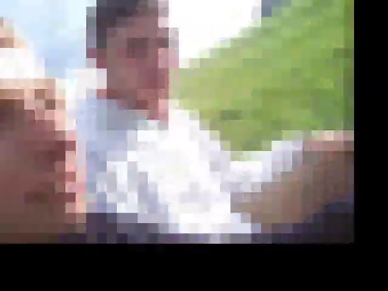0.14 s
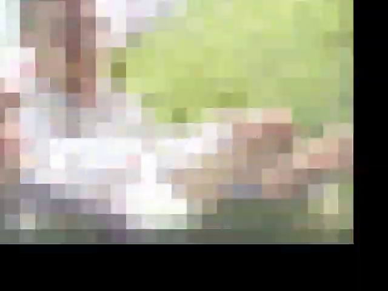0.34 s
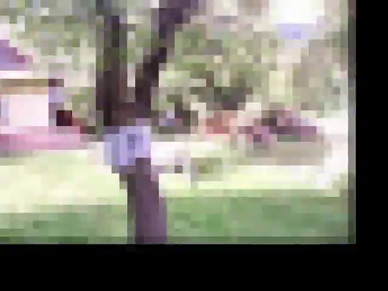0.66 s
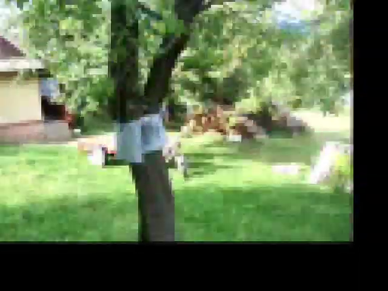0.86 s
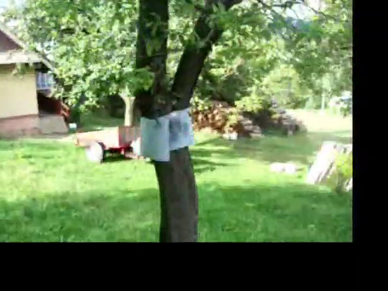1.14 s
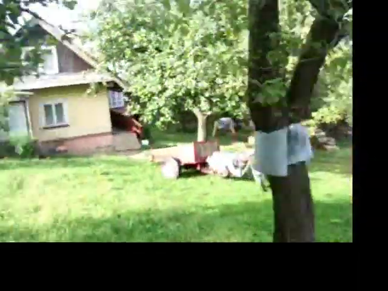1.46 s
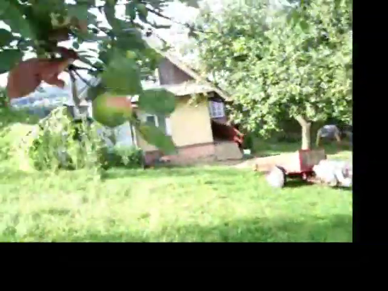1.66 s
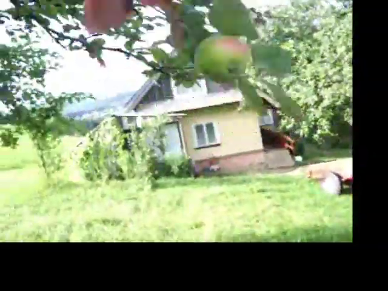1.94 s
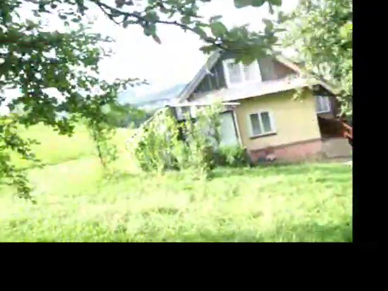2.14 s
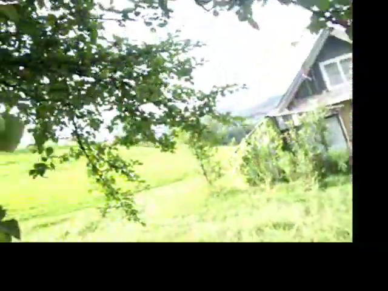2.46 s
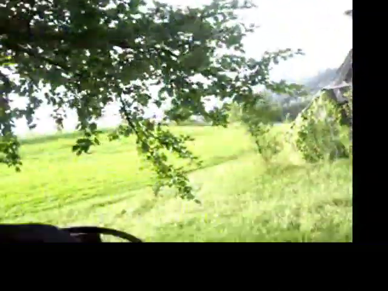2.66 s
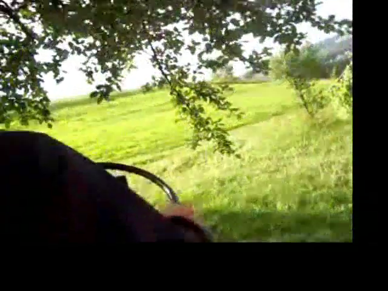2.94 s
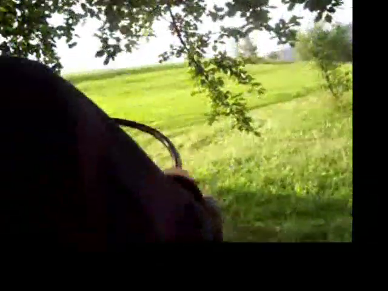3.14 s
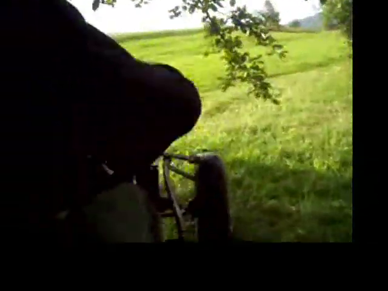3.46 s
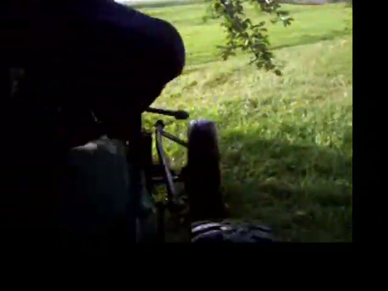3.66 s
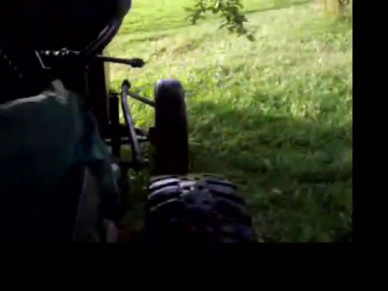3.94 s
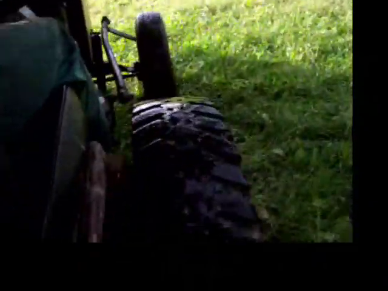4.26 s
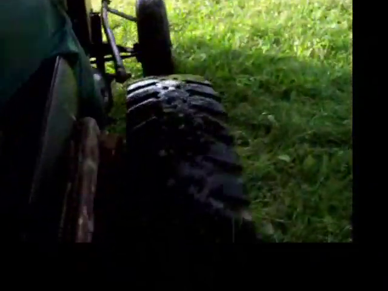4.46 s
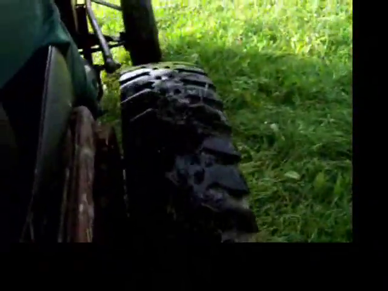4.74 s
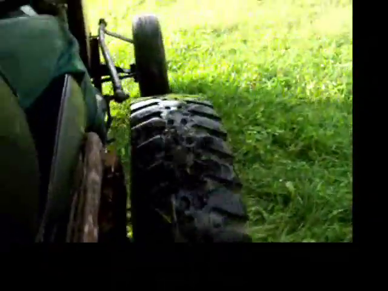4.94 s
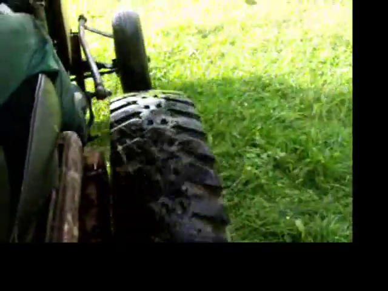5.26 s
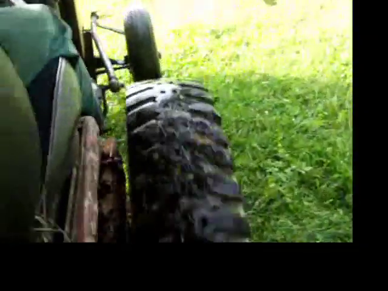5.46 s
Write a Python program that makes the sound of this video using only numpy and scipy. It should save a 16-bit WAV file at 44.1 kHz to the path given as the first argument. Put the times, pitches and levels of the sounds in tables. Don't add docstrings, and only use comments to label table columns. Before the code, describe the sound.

On board a small homemade tractor in open grass, a single-cylinder engine starts busy and uneven over strong cutter and gear roar. Within about a second the roar dies back and the exhaust falls into an even, hollow beat, six a second, with panel slams, knocks and tinny rattles between. After two seconds the microphone turns toward the wheel and the booms grow stronger. Cheap close microphone, overloaded peaks, dry open air.

```python
import sys
import numpy as np
from scipy import signal
from scipy.fft import rfft, irfft, next_fast_len
from scipy.io import wavfile
from scipy.ndimage import map_coordinates

SR = 44100
rng = np.random.default_rng(int(sys.argv[2]) if len(sys.argv) > 2 else 0)


def ratio_of_db(decibels):
    return 10 ** (np.asarray(decibels, float) / 20)


def transcribe(signal):
    frames = np.atleast_2d(signal).T
    limited = np.clip(frames, -1, 1)
    pcm = np.round(limited * 32767).astype(np.int16)
    wavfile.write(sys.argv[1], SR, pcm)


N = 246959


def unit(x):
    return x / np.sqrt(np.mean(x ** 2) + 1e-20)


def filtered(x, response):
    m = next_fast_len(N + SR // 2)
    spectrum = rfft(x, m) * response(np.fft.rfftfreq(m, 1 / SR))
    return irfft(spectrum, m)[..., :N]


def shape(points):
    f, db = np.transpose(points)
    return lambda hz: ratio_of_db(np.interp(np.log(hz + 1), np.log(f + 1), db, -120, -120))


def peak(f, hz, width):
    return 1j * f * width / (hz * hz - f * f + 1j * f * width + 1e-9)


def wobble(rate):
    knots = rng.standard_normal(int(N * rate / SR) + 4)
    return map_coordinates(knots, [np.arange(N) * rate / SR])


def noise(response, rough_db, rate):
    return unit(filtered(ratio_of_db(rough_db * wobble(rate)) * rng.standard_normal(N), response))


def add(track, s, piece):
    part = track[max(round(s * SR), 0):][:len(piece)]
    part += piece[:len(part)]


def bursts(times, dbs, t60s, rise, bend=1):
    env, t = np.zeros(N), np.arange(SR // 5) / SR
    for s, db, t60 in zip(times, dbs, t60s):
        fall = (np.maximum(t - rise, 0) / max(t60, 0.01)) ** bend
        swell = np.minimum(t / rise, 1) ** 0.5
        add(env, s - rise, ratio_of_db(db - 60 * fall) * swell)
    return env


def turned(s, pair):
    return np.interp(s, (2.24, 2.34), pair)


def damped(s, pair):
    return turned(s, pair) * np.where(s < 0.8, 0.65, 1)


def scatter(s):
    return rng.standard_normal((len(s), 2)).T


SCATTER_DB = 3

# (time [s], rolling level [dB], cutter level [dB])
LOAD = [(0.0, -18.5, -14), (0.25, -20.5, -17), (0.47, -23, -20), (0.809, -26, -24), (1.181, -29.5, -34.5),
        (1.448, -31.5, -35.5), (1.569, -27, -34), (1.758, -27.5, -34.5), (2.08, -23.5, -32.5),
        (2.34, -31, -36), (2.6, -29, -38.5), (2.81, -27, -38.5), (3.1, -26, -31.5), (3.452, -29, -36),
        (4.022, -24, -27.5), (4.57, -26.5, -30.5), (4.939, -24.5, -27.5), (5.6, -24, -29.5)]
# (frequency [Hz], level [dB per Hz])
SHAKE_COLOUR = [(12, -32.5), (20, -3), (86, -7.5), (140, -14.5), (180, -31), (310, -120)]
DRONE_COLOUR = [(59, -42), (100, -5.5), (275, -2.5), (314, -3), (366, -10), (450, -15.5), (580, -58.5),
                (990, -120)]
ROAR_COLOUR = [(220, -17.5), (380, -4), (472, 2), (562, 2.5), (611, -4), (693, 2), (773, 1), (995, -3),
               (1420, -22.5), (1600, -16.5), (2080, -40), (3520, -120)]
WHIRR_COLOUR = [(760, -38.5), (1300, 2.5), (1420, -37.5), (1590, -5.5), (2170, -0.5), (2480, -1.5),
                (2990, -8), (3430, -7.5), (3920, -13), (4740, -25.5), (6160, -74.5), (10400, -120)]


def running():
    s, *cols = np.transpose(LOAD)
    shaft_db = 0.7 * wobble(25)
    drone_db, roar_db = (np.interp(np.arange(N) / SR, s, c) + shaft_db for c in cols)
    shake_db = 5 + 1.746 * drone_db
    whirr_db = -18 + 0.83 * roar_db
    shake = ratio_of_db(shake_db) * noise(shape(SHAKE_COLOUR), rough_db=-3.0, rate=34)
    drone = ratio_of_db(drone_db) * noise(shape(DRONE_COLOUR), rough_db=3.0, rate=51)
    roar = ratio_of_db(roar_db) * noise(shape(ROAR_COLOUR), rough_db=0.5, rate=160)
    whirr = ratio_of_db(whirr_db) * noise(shape(WHIRR_COLOUR), rough_db=2.0, rate=67)
    return shake + drone + roar + whirr


def rattles():
    slam_s, _, _, cowl_db = np.transpose(PANEL_SLAMS)
    fire_s = np.transpose(EVEN_FIRINGS)[0]
    stray_s, stray_db, _ = np.transpose(VALVE_CLOSINGS + STRAY_BLOWS)
    t60 = 0.077

    def small(s, db):
        return [s, db + SCATTER_DB * scatter(s)[0], np.full(len(s), t60)]

    late = turned(slam_s, (0.0045, 0.0105))
    return np.hstack([[slam_s + late, cowl_db, damped(slam_s, (0.072, 0.088))],
                      small(fire_s - 0.012, turned(fire_s, (-18, -25))),
                      small(fire_s + 0.029, turned(fire_s, (-25, -28))),
                      [stray_s, stray_db, np.full(len(stray_s), t60)]])


# (frequency [Hz], width [Hz], level [dB])
COWLING_MODES = [(1990, 430, -3), (2323, 302, 2.5), (2655, 280, 0), (3480, 570, -12.5)]


def clatter():
    s, db, t60 = rattles()

    def cowling(f):
        modes = sum((-1) ** k * ratio_of_db(g) * peak(f, c, w) for k, (c, w, g) in enumerate(COWLING_MODES))
        return modes * peak(f, 2300, 1200)

    ringing = noise(cowling, rough_db=1.5, rate=300)
    wash = noise(shape(WHIRR_COLOUR), rough_db=1.5, rate=300)
    hum = ratio_of_db(turned(np.arange(N) / SR, (-47, -48)))
    near = (hum + bursts(s, db - 7.0, t60, rise=0.0017, bend=1.206)) * ringing
    return near + bursts(s, db - 18.5, 2.5 * t60, rise=0.00067) * wash


# (time [s], rattle level [dB], knock level [dB])
VALVE_CLOSINGS = [(.2843, -18, -14), (.6135, -41, -30), (.78, -20, -33), (1.455, -24.5, -11),
                  (1.623, -34, -10.5), (1.79, -25, -15.5), (1.952, -26, -12), (2.118, -18.5, -11),
                  (2.618, -31, -12.5), (2.783, -29.5, -13), (2.947, -30.5, -9.5), (3.109, -33.5, -11),
                  (3.436, -27.5, -11), (3.597, -33, -9), (3.758, -38.5, -10), (3.917, -26.5, -7),
                  (4.083, -32.5, -10.5), (4.233, -30, -14), (4.389, -26.5, -12.5), (4.548, -28.5, -12.5),
                  (4.704, -35, -10), (4.861, -27.5, -11.5), (5.321, -31.5, -9), (5.474, -37, -30)]
# (time [s], rattle level [dB], knock level [dB])
STRAY_BLOWS = [(0.103, -14.5, -25), (.147, -23.5, -16), (0.2123, -13, -19.5), (.273, -40.5, -5),
               (.347, -15, -6), (0.379, -20.5, -30), (.397, -34, -5.5), (.553, -42.5, -14),
               (.857, -14, -9.5), (1.009, -22, -21), (1.347, -29.5, -24)]


def blows():
    slam_s, slam_db, _, _ = np.transpose(PANEL_SLAMS)
    fire_s = np.transpose(EVEN_FIRINGS)[0]
    stray_s, _, stray_db = np.transpose(VALVE_CLOSINGS + STRAY_BLOWS)
    s, db, hz = np.hstack([
        [slam_s, slam_db + turned(slam_s, (4.5, 1)), turned(slam_s, (810, 654))],
        [fire_s - 0.006, turned(fire_s, (-10, -13.5)), np.full(len(fire_s), 780)],
        [stray_s, stray_db, turned(stray_s, (758, 640))]])
    size, pitch = scatter(s)
    return np.transpose([np.maximum(s, 0.003), db + 0.2 * SCATTER_DB * size, hz * np.exp(0.1 * pitch)])


def knocks():
    out, t = np.zeros(N), np.arange(SR // 8) / SR
    f = np.fft.rfftfreq(len(t), 1 / SR)
    env = ratio_of_db(-60 * (t / 0.067) ** 2) * (1 - np.exp(-t / 0.0013))
    for s, db, hz in blows():
        grit = rng.standard_normal(len(t))
        buzz = env * irfft(rfft(grit) * peak(f, hz, 370) ** 2, len(t))
        even = np.linalg.norm(env) / np.linalg.norm(buzz)
        add(out, s - 0.003, ratio_of_db(db - 10.5) * buzz * even)
    return out


# (time [s], spray level [dB], thump level [dB], cowling level [dB])
PANEL_SLAMS = [(0.0438, -10, -11, -15.5), (0.3153, -17, -14, -11), (0.4542, -14.5, -13.5, -18.5),
               (0.4854, -29, -19.5, -6), (.5875, -20, -35, -19.5), (0.6511, -13.5, -16.5, -4),
               (0.7213, -17.5, -31.5, -26.5), (.819, -12.5, -5.5, -4), (1.4902, -19.5, -13, -11),
               (1.6584, -14, -11.5, -2.4), (1.8228, -12, -11, -5), (1.9906, -16.5, -10, -11),
               (2.1523, -24.5, -14, -24), (2.6526, -19, -8.5, -13.5), (2.8198, -14.5, -8.5, -12),
               (2.9844, -12, -8, -12.5), (3.1443, -14.5, -7.5, -13), (3.47, -23.5, -7, -17.5),
               (3.6314, -21, -6, -12.5), (3.7958, -15.5, -7.5, -13), (3.9525, -14, -8, -13),
               (4.112, -14, -5.5, -20), (4.5824, -15.5, -7.5, -12.5), (4.7408, -16, -7, -16),
               (4.8978, -15, -4.5, -14), (5.0508, -17, -9.5, -13.5), (5.2071, -35, -16, -27.5),
               (5.359, -32, -20, -34.5)]
# (frequency [Hz], level [dB per Hz])
SPRAY_COLOUR = [(820, -49), (1400, -11.5), (1530, -11), (1790, -4), (1940, -19), (2700, -6.5), (2930, -6),
                (3860, -6), (4740, -23.5), (6160, -61), (10400, -120)]


def slams():
    s, db, thump_db, cowl_db = np.transpose(PANEL_SLAMS)
    t60 = damped(s, (0.12, 0.18))
    jolt_db = cowl_db + turned(s, (-15, -4))
    spray = bursts(s, db - 11, t60, rise=0.001, bend=0.76)
    spray += bursts(s + 0.0049, db - 11.0, 1.01 * t60, rise=0.0013, bend=0.96)
    out = spray * noise(shape(SPRAY_COLOUR), rough_db=1.5, rate=300)
    t = np.arange(SR // 10) / SR
    thump = np.sin(2 * np.pi * 235 * t) * np.exp(-(t / 0.007) ** 2) * (1 - np.exp(-t / 0.0016)) * 1.32
    jolt = np.sin(2 * np.pi * 62 * t) * np.exp(-t / 0.016)
    for at, thump_gain, jolt_gain in zip(s, ratio_of_db(thump_db - 2.5), ratio_of_db(jolt_db + 0.5)):
        add(out, at - 0.002, thump_gain * thump + jolt_gain * jolt)
    return out


# (time [s], blast level [dB], pipe pitch [Hz])
UNEVEN_FIRINGS = [
    (0.081, -2.5, 310),
    (.212, -4.5, 250.3),
    (0.352, -3, 241),
    (.485, -8, 290),
    (.527, -9.5, 270),
    (.619, -9.5, 265),
    (.696, -5.5, 283),
    (.751, -14, 299),
    (.863, -6, 292.3),
]
# (time [s], blast level [dB], pipe pitch [Hz])
EVEN_FIRINGS = [(1.028, -0.5, 261.3), (1.195, -2.5, 268), (1.366, -1.5, 244.5), (1.537, -4.5, 278),
                (1.704, -3, 283), (1.87, -3, 269.4), (2.031, -4.5, 286), (2.196, -3.5, 248),
                (2.363, -2.5, 228), (2.531, -0.5, 244.8), (2.697, -1.5, 263), (2.867, -2.5, 272),
                (3.027, -2.5, 248.5), (3.19, 1, 275), (3.353, 3.5, 249.4), (3.514, 1.5, 256.3),
                (3.677, 1.5, 260.4), (3.835, 0, 281), (3.995, 1.5, 268), (4.154, -1, 279.4), (4.31, 3, 270),
                (4.467, 4, 265.8), (4.626, 2.5, 286.5), (4.782, 2.5, 284.7), (4.935, 0, 295),
                (5.091, 2.5, 281), (5.243, 2, 287), (5.398, 4.5, 285), (5.551, 1, 291.7)]


def exhaust():
    out, t = np.zeros(N), np.arange(SR // 10) / SR
    for s, blast_db, pipe_hz in UNEVEN_FIRINGS + EVEN_FIRINGS:
        build_s, ring_hz = turned(s, (6.6, 8.37)) / 1000, turned(s, (329, 283))
        u = t / build_s
        blast = u ** turned(s, (1.55, 1.65)) * np.exp(0.5 * (1 - u ** 3))
        ring_db = turned(s, (-9.5, -11.5)) - 0.44 * max(blast_db, -3)
        takeover = 1 - np.exp(-(u / turned(s, (1.39, 1.27))) ** 2.5)
        ring = ratio_of_db(ring_db) * takeover * ratio_of_db(4) * np.exp(-(t / 0.019) ** 2)
        warm_up = 1.0463 * t - 0.002 * (1 - np.exp(-t / 0.0077))
        ring_shift = (1.05 * ring_hz - 1.07 * pipe_hz) * np.maximum(t - 1.3 * build_s, 0)
        boom = (blast + ring) * np.sin(2 * np.pi * (pipe_hz * warm_up + ring_shift))
        rock = ratio_of_db(-18.0) * np.sin(2 * np.pi * 70 * t) * np.exp(-t / 0.01)
        add(out, s - 0.0035, ratio_of_db(blast_db) * (boom - rock))
    return out


def scene():
    return (running() + clatter() + knocks() + slams() + exhaust())[None]


# (time [s], peak level [dB])
OVERLOADS = [
    (0.2157, -31.5),
    (.3501, -32),
    (0.6603, -25),
    (.826, -39),
    (1.0301, -51.5),
    (1.075, -48),
    (1.6646, -30),
]
# (frequency [Hz], level [dB per Hz])
CRACKLE_COLOUR = [(4600, -28), (5400, 2.5), (7500, -1.5), (11000, -7), (14500, -12.5), (15700, -41.5)]


def crackle():
    s, db = np.transpose(OVERLOADS)
    spikes = np.zeros(N)
    spikes[np.round((s + 0.001) * SR).astype(int)] = ratio_of_db(db + 16)
    smear = bursts(s + 0.002, db - 33, np.full(len(s), 0.04), rise=0.013)
    smear = smear * noise(shape(CRACKLE_COLOUR), rough_db=-4.0, rate=100)
    return filtered(spikes, shape(CRACKLE_COLOUR)) + smear


def top_cut(x):
    return signal.sosfilt(signal.butter(12, 15740, fs=SR, output="sos"), x)


def record(dry):
    squashed = dry / (1 + np.maximum(dry / 0.74, 0) ** 8) ** (1 / 8)
    coupled = filtered(squashed, lambda f: 1j * f / (1j * f + 12))
    floored = coupled / (1 + np.maximum(-coupled / 0.94, 0) ** 14) ** (1 / 14)
    narrow = filtered(floored, lambda f: 1 / (1 + (f / 5105) ** 30))
    return top_cut(narrow + crackle())


dry = scene()
out = record(dry)
transcribe(out)
```